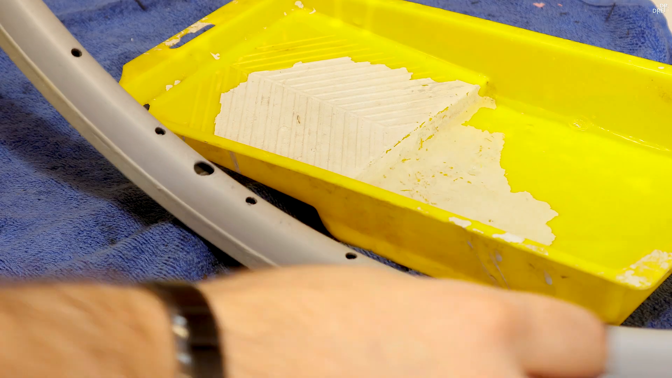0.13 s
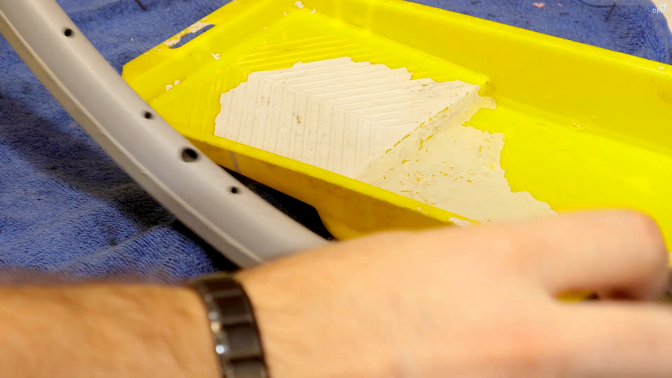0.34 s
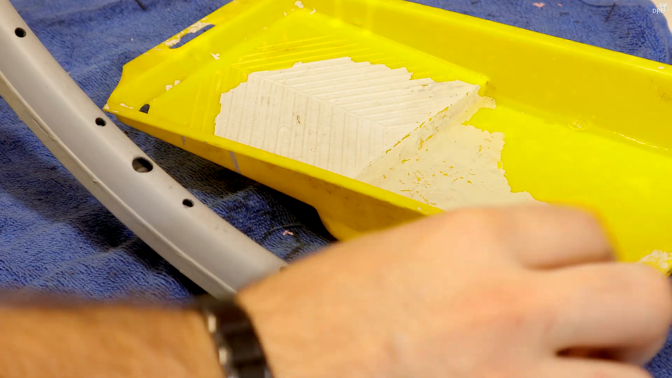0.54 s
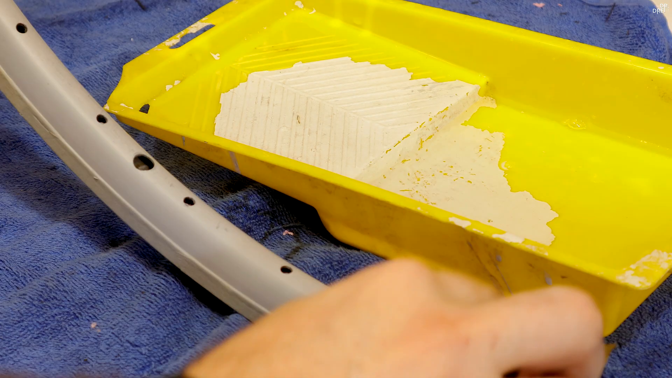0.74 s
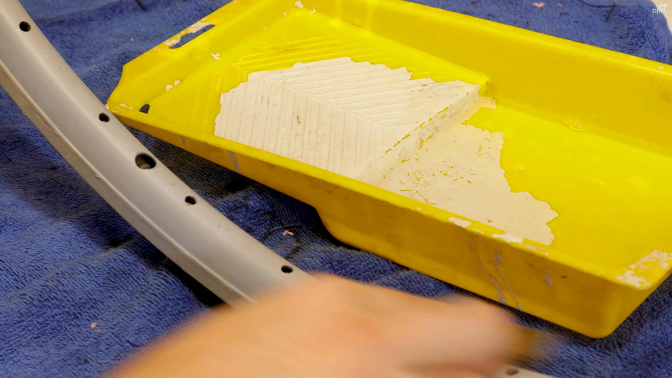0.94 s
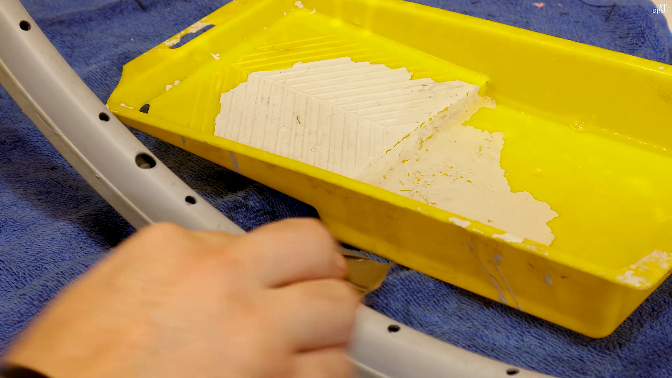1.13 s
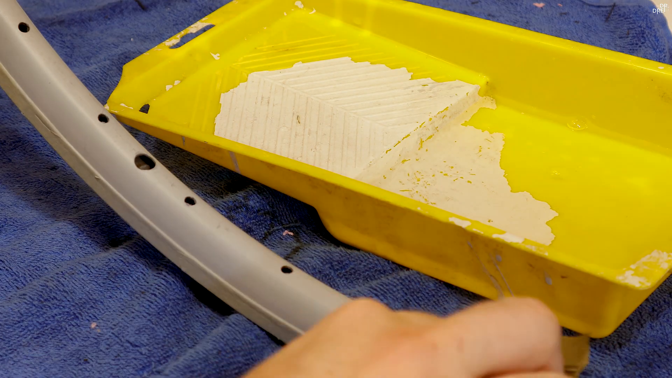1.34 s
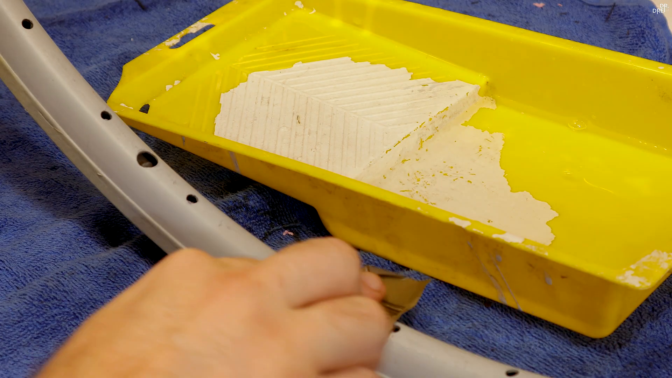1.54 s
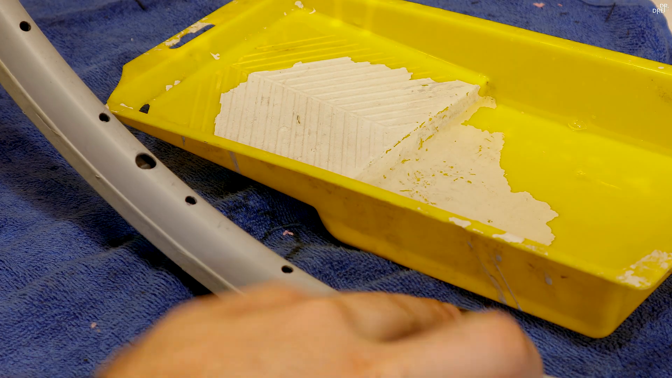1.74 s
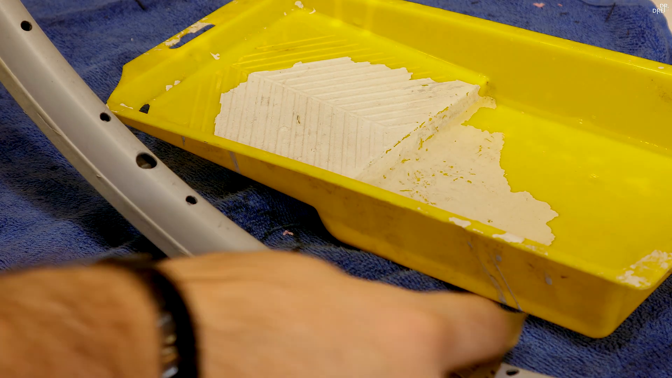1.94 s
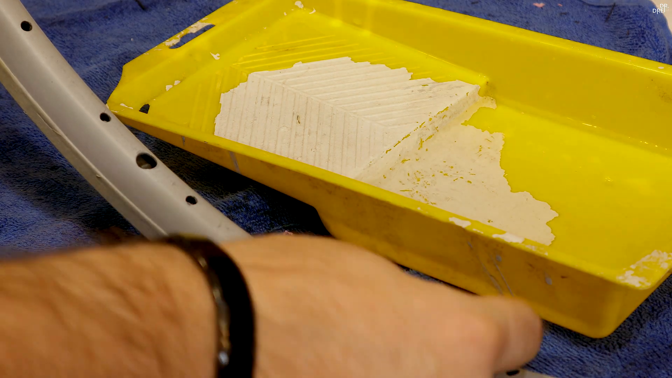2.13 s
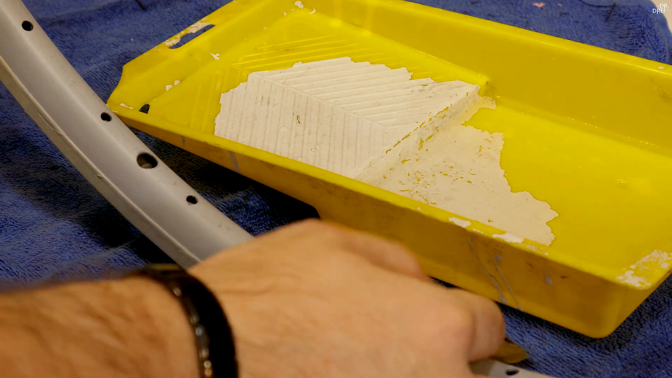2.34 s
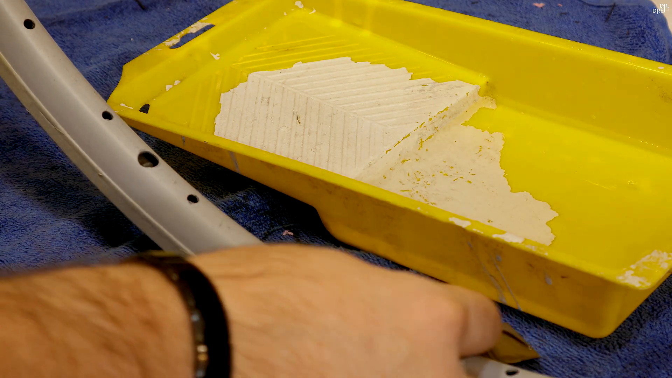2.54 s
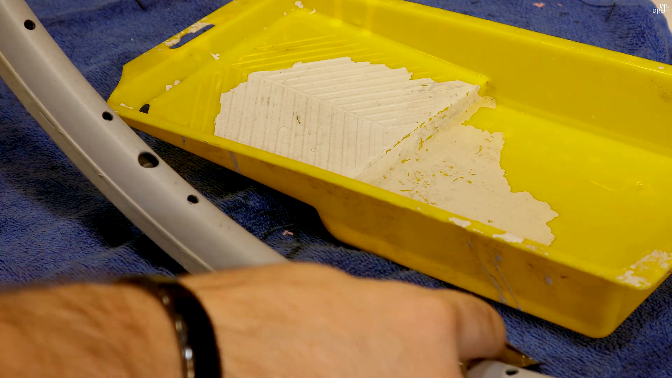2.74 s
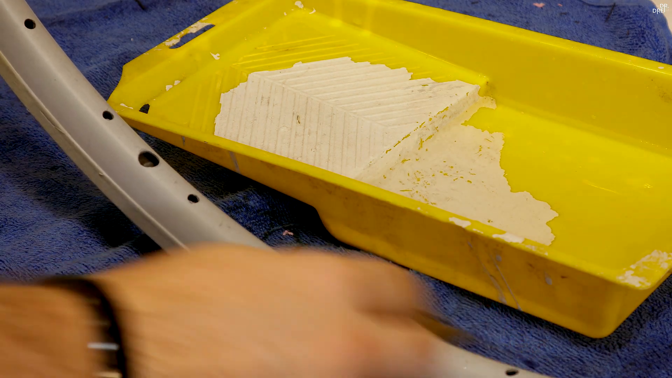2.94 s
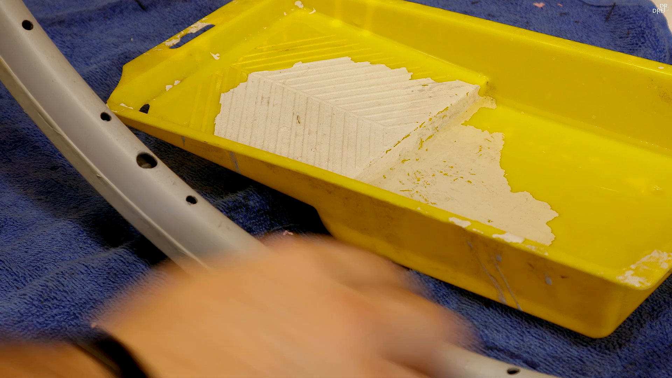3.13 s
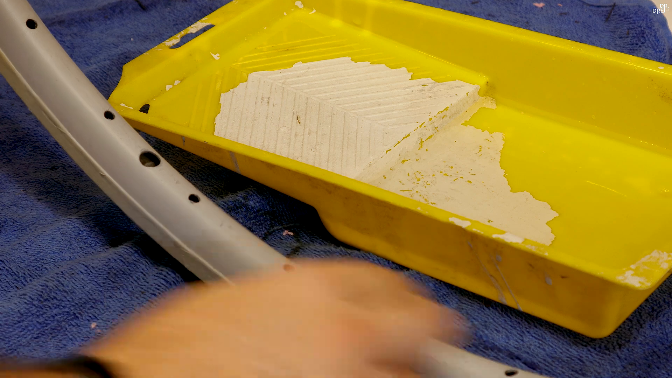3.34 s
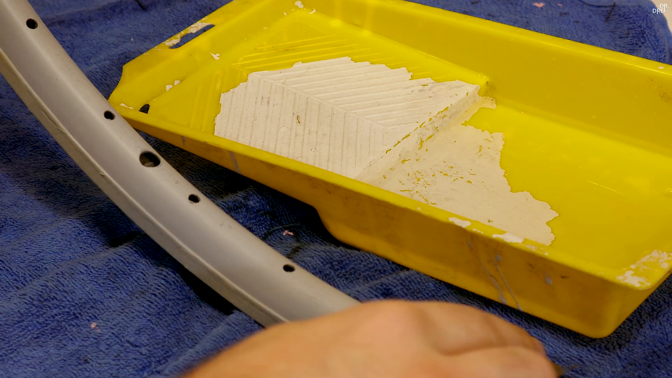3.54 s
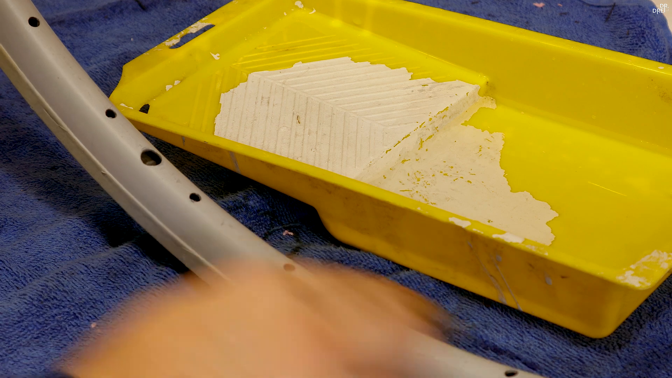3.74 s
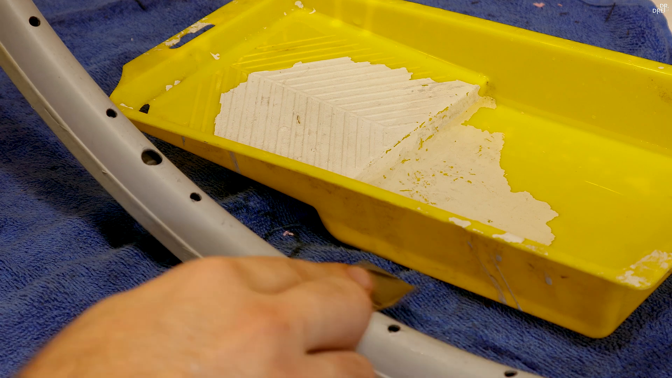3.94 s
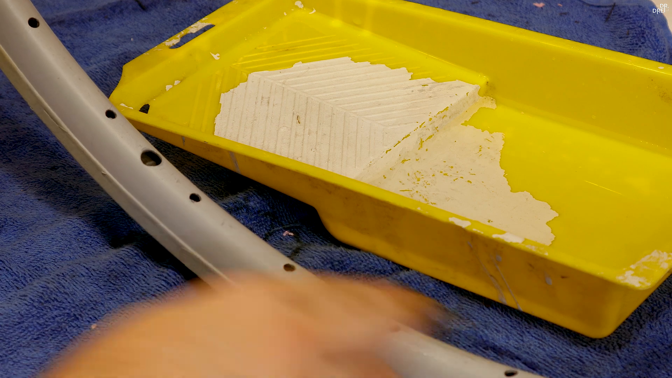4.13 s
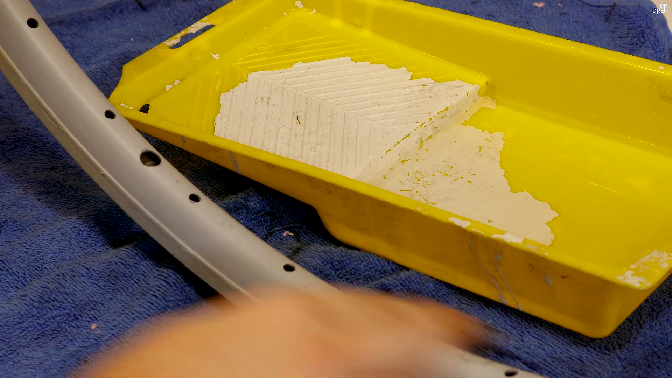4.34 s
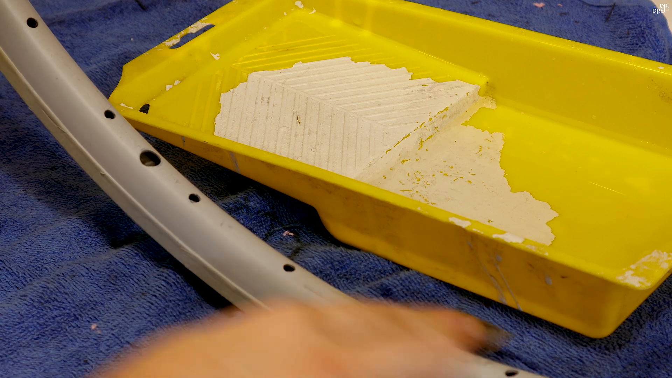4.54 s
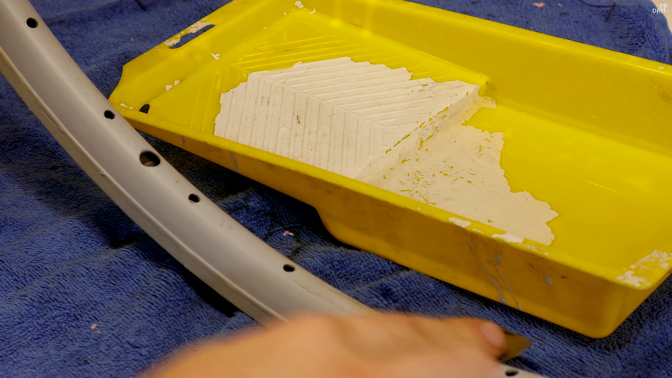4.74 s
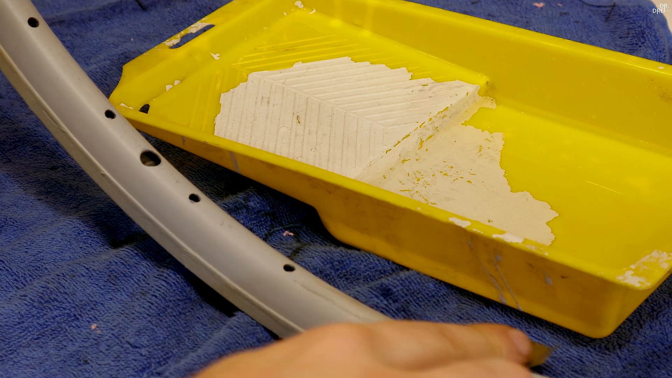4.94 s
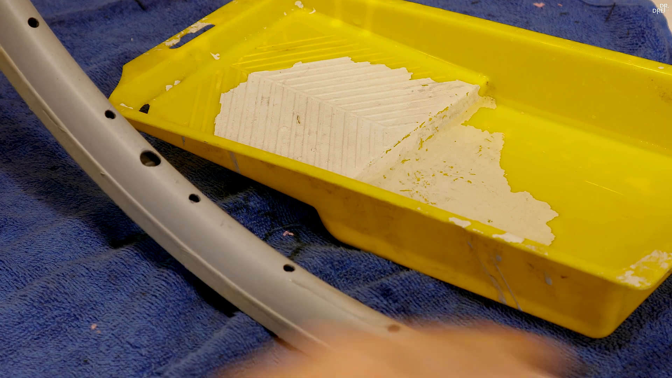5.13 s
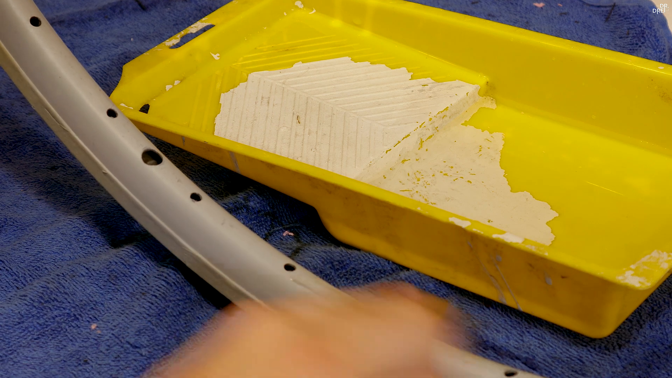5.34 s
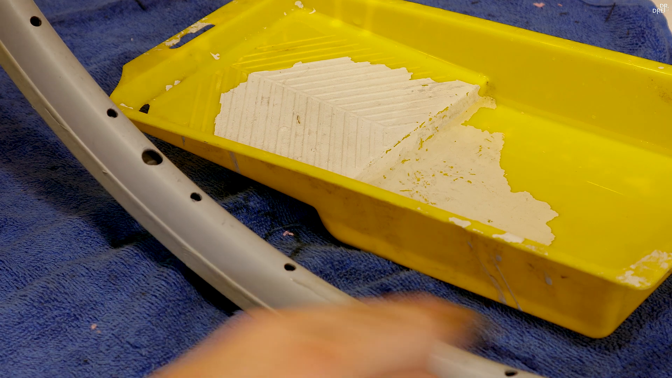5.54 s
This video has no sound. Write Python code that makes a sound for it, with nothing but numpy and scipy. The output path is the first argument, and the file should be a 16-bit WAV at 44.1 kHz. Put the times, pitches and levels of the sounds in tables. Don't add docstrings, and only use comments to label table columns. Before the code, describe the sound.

A close, nearly mono microphone in a quiet workshop with faint room hiss and a short dull reflection. From 0 to 0.7 s there are mostly soft, low puffs of air from a moving arm, with a rounded pop near 0.6 s and almost inaudible scuffs. Light scrapes appear at 0.75 s; from 1.0 to 1.8 s separate sandpaper strokes hiss brightly along a metal rim, with gritty catches, small metallic knocks and sharp snaps near 1.35, 1.42, 1.6 and loudest at 1.71 s. From 1.9 to 2.7 s only tiny, faint, irregular scuffs remain. Strokes return at 2.8 s and strengthen by 3.0-3.3 s, with edge catches and another hard snap at 3.32 s. From 3.4 s until the cut at about 5.6 s, an even back-and-forth rasp speeds from roughly seven to nine strokes per second, growing slightly louder over stronger low air thumps.

```python
import sys
import numpy as np
from scipy import signal
from scipy.fft import rfft, irfft
from scipy.io import wavfile

SR = 44100
rng = np.random.default_rng(int(sys.argv[2]) if len(sys.argv) > 2 else 0)


def to_wav(s):
    ch = np.atleast_2d(s).T
    pcm = np.round(np.clip(ch, -1, 1) * 32767)
    wavfile.write(sys.argv[1], SR, pcm.astype(np.int16))


def boost_factor(decibels):
    exponent = np.asarray(decibels, float) / 20
    return 10 ** exponent


N = 245891
FIRM_DB = -50


def response(spectrum):
    hz, level_db = np.transpose(spectrum)
    bins_hz = np.fft.rfftfreq(N, 1 / SR) + 1e-3
    return boost_factor(np.interp(np.log(bins_hz), np.log(hz), level_db))


def coloured(x, spectrum, low_hz, high_hz):
    hz = np.fft.rfftfreq(N, 1 / SR)
    shaped = rfft(x) * response(spectrum)
    inside = shaped[(hz > low_hz) & (hz < high_hz)]
    return irfft(shaped, N) * N / np.sqrt(2 * np.sum(np.abs(inside) ** 2))


def drift(rate_hz):
    r = np.exp(-40 * np.pi * rate_hz / SR)
    slow = signal.lfilter([1], [1, -2 * r, r * r], rng.standard_normal(N // 20 + 4002))[4000:]
    return np.interp(np.arange(N) / 20, np.arange(len(slow)), slow / slow.std())


def resonate(x, hz, width_hz):
    r = np.exp(-np.pi * width_hz / SR)
    zeros = np.array([1, 0, -1]) * (1 - r * r) / 2
    return signal.lfilter(zeros, [1, -2 * r * np.cos(2 * np.pi * hz / SR), r * r], x)


def band(x, low_hz, high_hz):
    return signal.sosfilt(signal.butter(2, [low_hz, high_hz], "band", fs=SR, output="sos"), x)


def sweep(start, length, peak, linger_s):
    end = start + length + linger_s
    span = np.arange(max(int(start * SR), 0), min(int(end * SR), N))
    fastest = start + np.clip(peak, .02, .98) * length
    travel = np.interp(span / SR, [start, fastest, end], [0, .5, 1])
    return span, np.abs(np.sin(np.pi * travel)), travel < .5


# (frequency [Hz], level [dB per Hz])
ROOM_COLOUR = [(18, -36), (30, -8.5), (152, 3), (352, -7.5), (535, -9), (800, -16.5), (1370, -18),
               (7540, -22), (15700, -23.5)]


def room_tone():
    return boost_factor(-72) * coloured(rng.standard_normal(N), ROOM_COLOUR, 450, 13600)


# (start [s], length [s], strongest point [share 0-1], rumble [dB])
ARM_PUFFS = [(-.04, 0.058, 0.14, -51), (0.016, 0.3, 0.46, -55), (0.28, 0.33, 0.75, -59.5),
             (0.734, 0.26, 0.6, -57.5), (1.064, 0.21, 0.95, -51.5), (1.257, 0.28, 0.1, -54.5),
             (1.555, 0.112, 0.98, -51), (1.702, 0.13, .25, -50.5), (1.89, 0.12, 0.68, -55),
             (2.087, 0.15, 0.63, -57.5), (2.27, 0.065, 0.4, -61.5), (2.608, 0.13, 0.66, -63.5),
             (2.822, 0.077, 1, -62), (3.062, 0.16, 0.26, -56), (3.164, 0.092, 0.5, -54.5),
             (3.301, 0.13, .45, -60.5), (3.45, 0.2, 0.1, -56.5), (3.613, 0.097, 0.7, -59),
             (3.762, 0.18, 1, -48), (4.069, 0.19, 0.7, -45.5), (4.312, 0.17, 0.99, -46.5),
             (4.564, 0.14, 0.94, -45.5), (4.775, 0.14, 0.82, -45), (4.989, 0.16, 0.82, -48),
             (5.171, 0.18, 1, -48), (5.445, 0.23, 0.77, -41.5)]
# (frequency [Hz], level [dB per Hz])
GUST_COLOUR = [(15, -23), (25, -12), (92, 0.5), (178, 0.5), (296, -3), (453, -5), (700, -16), (1100, -22.5),
               (2400, -20)]


def puffs():
    power = np.full(N, boost_factor(-75.5) ** 2)
    for start, length, peak, rumble_db in ARM_PUFFS:
        span, speed, _ = sweep(start, length, peak, linger_s=0.0093)
        power[span] += (boost_factor(rumble_db) * speed ** 0.95) ** 2
    gust = np.sqrt(power) / boost_factor(FIRM_DB)

    lumps_db = 1.5 * drift(23.0) + 3.2 * drift(97)
    eddies = coloured(rng.standard_normal(N) * boost_factor(lumps_db), GUST_COLOUR, 50, 400)
    rumble, flutter = band(eddies, 33, 520), band(eddies, 400, 1000)
    rumble = gust * rumble / rumble.std()
    flutter = boost_factor(-9.5) * gust ** 0.65 * flutter / flutter.std()
    return boost_factor(FIRM_DB) * (rumble + flutter)


# (time [s], peak [dB], pitch [Hz], snap [0-1])
AIR_POPS = [(0.593, -37, 112, 0.23), (0.844, -50, 167, 0.23), (0.912, -45, 156, 0),
            (1.259, -41.5, 180, 0.77), (1.5, -47, 148, 0.22), (1.742, -35.5, 174, 0.37),
            (2.278, -45, 185, 0.33), (3.085, -59, 96, 0.9), (3.233, -39.5, 199, 0.2),
            (3.809, -36.5, 152, 0.15), (4.095, -36.5, 150, 0), (4.425, -40, 158, 0.33),
            (4.452, -36, 285, 0.4), (4.471, -32.5, 160, 0.15), (.002, -41, 91, 0.11),
            (1.639, -37, 190, 0.04), (3.919, -33, 230, 0.1), (4.875, -33, 130, 0.18),
            (5.33, -35, 210, 0.23), (5.539, -41, 100, 0)]


def pops():
    out, t = np.zeros(N), np.arange(1500) / SR
    for time, peak_db, hz, snap in AIR_POPS:
        i = round(time * SR)
        swing = np.sin(2 * np.pi * hz * t) * np.exp(-t * hz * 1.22)
        suck = -9 * snap * np.exp(-t / 0.00041) * (1 - np.exp(-t / 0.00013)) ** 2
        out[i:i + 1500] += boost_factor(peak_db) * (swing + suck)
    return out


# (start [s], length [s], fastest point [share 0-1], hiss [dB])
LOOSE_STROKES = [(.3, 0.13, 0.35, -76.5), (0.472, 0.14, 0.9, -73.5), (0.705, 0.015, 0.5, -75),
                 (0.749, 0.072, 0.52, -61.5), (.815, 0.093, 0.54, -68.5), (0.999, 0.11, 0.8, -55),
                 (1.087, .16, 0.49, -50), (1.267, 0.22, 0.51, -47.5), (1.515, 0.14, 0.8, -47.5),
                 (1.713, .11, 0.27, -48.5), (1.93, 0.075, 0.56, -63.5), (2.031, 0.016, 0.4, -69),
                 (2.063, 0.054, 0.45, -61.5), (2.183, 0.034, .5, -70), (2.251, 0.028, 0.4, -65.5),
                 (2.287, 0.051, 0.4, -69), (2.38, 0.041, 0.67, -60), (2.428, 0.046, 0.6, -66),
                 (2.562, 0.085, 0.6, -65), (2.646, 0.059, 0.36, -66.5), (2.771, .15, 0.43, -54),
                 (2.99, 0.075, 0.87, -49), (3.08, 0.071, 0.85, -45.5), (3.2, 0.067, 0.8, -45),
                 (3.269, 0.092, 0.71, -43)]
# (start [s], length [s], fastest point [share 0-1], hiss [dB])
FAST_STROKES = [(3.387, 0.14, 0.77, -42.5), (3.545, 0.14, 0.68, -43.5), (3.696, 0.12, 0.66, -42.5),
                (3.844, 0.099, 0.57, -44), (3.965, 0.11, 0.5, -45), (4.096, 0.096, 0.78, -45),
                (4.214, 0.1, 0.6, -46), (4.339, 0.093, 0.63, -44), (4.449, 0.095, 0.48, -43),
                (4.56, 0.085, 0.82, -41), (4.665, 0.084, 0.56, -41), (4.771, 0.091, 0.65, -41),
                (4.879, 0.097, 0.52, -39.5), (4.997, 0.082, 0.63, -38.5), (5.093, 0.093, 0.64, -41),
                (5.202, 0.14, 0.62, -41), (5.356, 0.096, 0.72, -40), (5.468, 0.14, 0.36, -40.5)]


def hand():
    power, steepness = np.zeros((3, N)), np.array([[.8], [1.3], [2.1]])
    creep_s, bite = 0.022, 0.85
    loose, fast = len(LOOSE_STROKES), len(FAST_STROKES)
    fine_db = [-22] * loose + [-18, -19.5] * fast
    roundness = [0.97] * loose + [1.145] * fast
    strokes = LOOSE_STROKES + FAST_STROKES
    for (start, length, fastest, hiss_db), fine, curve in zip(strokes, fine_db, roundness):
        span, speed, rising = sweep(start - 0.35 * creep_s, length + 0.26 * creep_s, fastest, creep_s)
        speed = speed ** (curve * np.where(rising, bite, 1))
        effort_db = hiss_db - FIRM_DB
        ring_db = FIRM_DB - 9 + 0.75 * effort_db
        finest_db = FIRM_DB + fine + 1.1 * effort_db
        levels = boost_factor([ring_db, hiss_db, finest_db])
        power[:, span] += (levels[:, None] * speed ** steepness) ** 2
    return np.sqrt(power)


def grit(per_s, spread_db):
    sizes = boost_factor(spread_db * np.minimum(rng.exponential(1, N), 5)) * rng.choice([-1, 1], N)
    clumps = boost_factor(2.0 * drift(68) + 2.16 * drift(1.6))
    x = sizes * (rng.random(N) < per_s / SR) * clumps
    return x / x.std()


# (frequency [Hz], level [dB per Hz])
PAPER_COLOUR = [(470, -10), (800, 0), (1110, 7.5), (2010, 4), (2610, 9), (3150, 5.5), (3890, 10), (5380, 7),
                (6250, 13), (7820, 11), (8630, 14.5), (9900, 9.5), (12800, 2.5), (15700, 9)]
# (frequency [Hz], width [Hz], level [dB])
RIM_MODES = [(1237, 35, 2), (1331, 45, -2), (1493, 50, -4), (1890, 70, -4), (2208, 55, -2), (2354, 35, -1),
             (2516, 70, 1), (2690, 60, -1), (2920, 60, -3), (3342, 35, -4), (3618, 60, 0), (3791, 60, 0),
             (3908, 70, 0), (4530, 80, -2), (5030, 70, 1), (5702, 40, 7), (6500, 550, 1.5), (7250, 250, 3),
             (8480, 350, 5), (9000, 250, 3), (9700, 400, 4), (10500, 400, 0), (11100, 300, -5),
             (11900, 400, -6)]


def sanding():
    layers = np.zeros((3, N))
    broad = coloured(grit(per_s=14000, spread_db=2.5), PAPER_COLOUR, 3300, 16000)
    edges_hz = 500 * 2 ** np.arange(0, 5.2, 1 / 3)
    for k, (low, high) in enumerate(zip(edges_hz, edges_hz[1:])):
        layer = np.searchsorted([4400, 11000], low)
        layers[layer] += (-1) ** k * band(broad, low, high) * boost_factor(2.0 * drift(7))

    grains = grit(per_s=9000, spread_db=2.0)
    for k, (hz, width, level_db) in enumerate(RIM_MODES):
        swell = boost_factor(level_db + 3.75 * drift(9.9))
        layers[int(hz > 4800)] += (-1) ** k * resonate(grains, hz, width) * swell
    return np.sum(hand() * layers / layers.std(axis=1, keepdims=True), axis=0)


def workshop(x):
    t = np.arange(SR // 3) / SR
    t60_s = 0.2
    tail = band(rng.standard_normal(len(t)), 900, 6300) * boost_factor(-60 * t / t60_s) * (t > .004)
    return boost_factor(-14) * signal.fftconvolve(x, tail / np.sqrt(np.sum(tail ** 2)))[:N]


# (time [s], peak [dB], rim knock [dB], knock pitch [Hz])
HOLE_CATCHES = [(0.7108, -48.5, -81, 1840), (0.743, -48, -76, 1820), (0.918, -50.5, -83, 1100),
                (1.288, -33, -54, 4020), (1.3498, -23, -39.5, 2460), (1.4157, -29, -44, 1190),
                (1.5251, -32.5, -53.5, 3860), (1.5963, -27, -77, 3960), (1.7117, -33, -48, 2310),
                (2.266, -44, -58.5, 3920), (2.5835, -41, -87, 4020), (2.7745, -54, -83, 4050),
                (3.0135, -33, -77, 3830), (3.089, -25.5, -69, 3600), (3.1274, -22, -50, 3520),
                (3.3181, -29, -44.5, 3650), (3.454, -26.5, -58, 3920), (3.495, -29.5, -47.5, 2650),
                (3.628, -43, -52, 2720), (3.7504, -43, -45.5, 4000), (3.852, -41, -66, 4020),
                (3.9179, -54, -42.5, 2660), (4.5704, -32, -66, 2210), (4.787, -27, -71, 3920),
                (5.0005, -25, -66, 3760), (5.4298, -46, -46, 2610)]


def catches():
    spurts, knocks, t = np.zeros(N), np.zeros(N), np.arange(4000) / SR
    noise = band(band(grit(per_s=12000, spread_db=2.5), 5000, 11000), 4500, 12000)
    noise /= noise.std()
    when, peak_db, knock_db, pitch_hz = np.transpose(HOLE_CATCHES)
    at = np.round(when * SR).astype(int)
    spurt = np.exp(-t / 0.01) * (1 - np.exp(-t / 0.00081))
    for i, level in zip(at, boost_factor(peak_db - 14.5)):
        spurts[i:i + 4000] += level * spurt * noise[i:i + 4000]

    chance_db = rng.normal(0, 2.2, (len(at), len(RIM_MODES)))
    for k, (hz, width, _) in enumerate(RIM_MODES[:15]):
        off_pitch_db = np.minimum(25 * np.abs(np.log2(hz / pitch_hz)), 11)
        blows = np.zeros(N)
        blows[at] = boost_factor(knock_db + 40.5 + chance_db[:, k] - off_pitch_db)
        knocks += (-1) ** k * resonate(blows + 1e-18, hz, 1.1 * width)
    return spurts + knocks


# (start [s],
# length [s], pitch [Hz], width [Hz], level [dB])
RINGING_SWELLS = [(1.188, 0.064, 8250, 500, -53.5), (1.255, 0.075, 8300, 500, -53.5),
                  (1.318, .07, 820, 204, -55.5), (2.802, .06, 432, 150, -64), (1.328, 0.12, 347, 152, -61),
                  (1.254, 0.26, 4050, 250, -64), (1.525, 0.035, 3930, 250, -58),
                  (1.596, 0.023, 5620, 120, -45), (2.767, 0.12, 3840, 500, -61), (2.803, 0.05, 870, 150, -61),
                  (2.983, 0.089, 3910, 500, -60.5), (3.026, 0.033, 1225, 50, -53),
                  (3.322, 0.041, 1230, 60, -70), (3.475, 0.052, 2590, 70, -60),
                  (3.455, 0.051, 1340, 120, -56.5), (3.9, 0.041, 2530, 200, -51),
                  (5.418, 0.048, 2480, 250, -52.5)]


def singing():
    out, noise = np.zeros(N), rng.standard_normal((len(RINGING_SWELLS), SR // 2))
    for (start, length, hz, width, level_db), push in zip(RINGING_SWELLS, noise):
        tone = resonate(resonate(push, hz, width), hz, 2 * width)[-round(length * SR):]
        swell = np.sqrt(np.hanning(len(tone)))
        i = round(start * SR)
        out[i:i + len(tone)] += boost_factor(level_db) * tone / tone.std() * swell
    return out


# (time [s], peak [dB])
GRAIN_TICKS = [
    (1.3486, -31),
    (1.4174, -25),
    (1.7125, -20),
    (1.598, -27),
    (2.583, -52),
    (3.317, -21),
]


def ticks():
    clicks = np.full(N, 1e-18)
    for time, peak_db in GRAIN_TICKS:
        clicks[round(time * SR)] = boost_factor(peak_db - 6.0)
    return band(clicks, 1300, 17000)


# (frequency [Hz], level re the common sound [dB])
CHANNEL_DIFFERENCE = [(60, -67), (110, -52), (200, -41), (380, -30), (700, -23.5), (1290, -27), (2380, -24),
                      (4400, -23.5), (8120, -32.5), (15000, -15.5)]


def scene():
    rubbing = sanding() + catches() + singing() + ticks()
    mid = room_tone() + puffs() + pops() + rubbing + workshop(rubbing)
    side = irfft(1j * rfft(mid) * response(CHANNEL_DIFFERENCE), N)
    return np.array([mid + side, mid - side])


def top_cut(x):
    return signal.sosfilt(signal.butter(12, 16430, fs=SR, output="sos"), x)


def record(dry):
    low_pass = signal.ellip(12, .5, 70, 15730, fs=SR, output="sos")
    mix = signal.sosfilt(low_pass, dry)
    return top_cut(mix)


dry = scene()
out = record(dry)
to_wav(out)
```